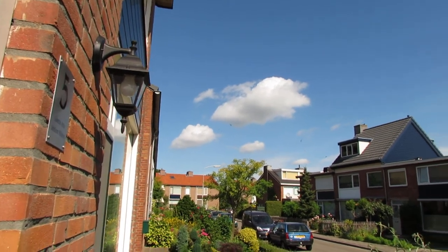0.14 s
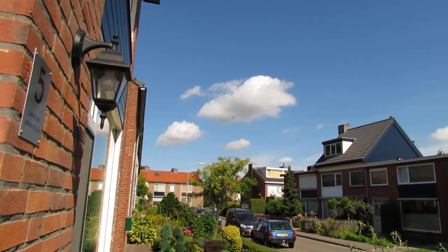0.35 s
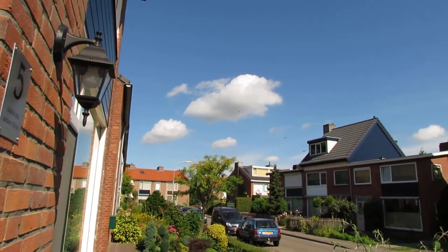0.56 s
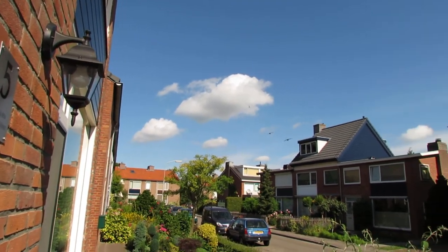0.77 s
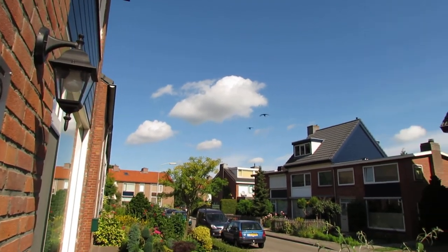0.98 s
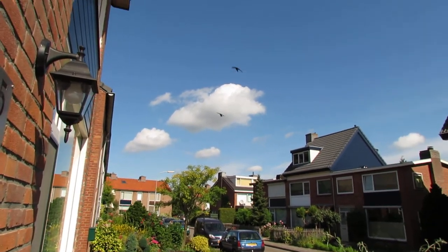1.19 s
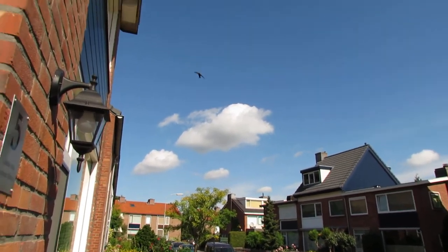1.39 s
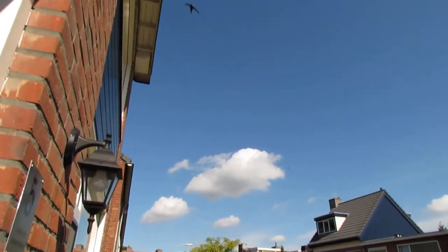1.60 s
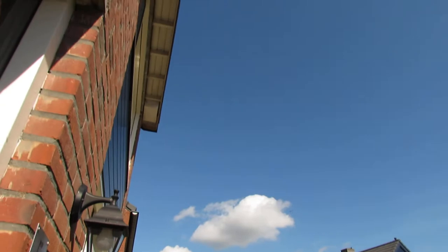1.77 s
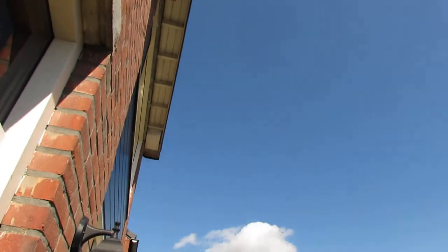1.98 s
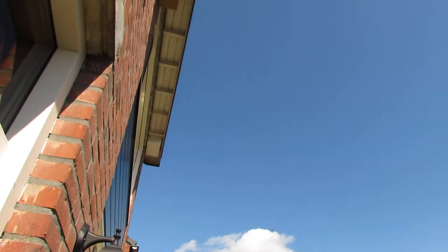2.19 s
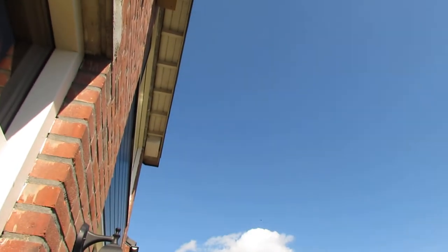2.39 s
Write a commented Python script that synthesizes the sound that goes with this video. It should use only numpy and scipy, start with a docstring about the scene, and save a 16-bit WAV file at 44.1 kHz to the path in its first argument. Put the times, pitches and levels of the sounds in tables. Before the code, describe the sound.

Swifts scream in a residential street over soft low traffic rumble and a faint engine hum. Thin, buzzing whistles around 6 kHz rise from 0.2 s, with stuttering short notes at 0.65-0.95 s. The loudest, closest screams come at 1.05-1.45 s, overlapping a rapid trill until 1.56 s. Echoes fade off the houses; small knocks follow at 1.8 s, ticks and a faint distant crow-like yelp near 2.1 s.

```python
"""Over rumbling traffic and an engine hum, swifts scream as they race along a brick street and over the eaves.
Each scream is a rising whistle near 6 kHz, shaken about 260 times a second; trills of short notes break in.
A crow-like bird yelps far off, a falling stack of harmonics, early on and once more near the end.
House fronts throw the calls back as echoes and a noise tail; gain control ducks under the loudest screams.
After the last trill come small knocks and ticks, each a dying ring."""
import sys
import numpy as np
from scipy import signal
from scipy.io import wavfile
from scipy.ndimage import uniform_filter1d, minimum_filter1d

SR = 44100
rng = np.random.default_rng(int(sys.argv[2]) if len(sys.argv) > 2 else 0)


def decibels_to_gain(level_db):
    """Convert a level in decibels to a linear amplitude gain (20 dB per decade)."""
    exponent = np.asarray(level_db, float) / 20
    return 10 ** exponent


def generate_wav(sig):
    """Save sig (samples, or channels by samples) to the path in sys.argv[1] as 16-bit PCM at SR."""
    pcm = np.round(np.clip(np.atleast_2d(sig).T, -1, 1) * 32767).astype(np.int16)
    wavfile.write(sys.argv[1], SR, pcm)


N = 108045

# Balance of the swift's voice: relative level in dB of the partials at 0.5, 1, 1.5, 2 and 2.5 x pitch
PARTIAL_DB = [-11, 1, 1.5, -11, -5.5]
# Half the left-minus-right difference for each ear
SIDES = np.array([[.5], [-.5]])


def curve(rows):
    """Columns of a table at every sample, and a gate that is open while the table lasts."""
    edge_s = .003
    s, *cols = np.transpose(rows)
    t = np.arange(N) / SR
    gate = np.clip(np.minimum(t - s[0] + edge_s, s[-1] + edge_s - t) / edge_s, 0, 1)
    return [np.interp(t, s, c) for c in cols] + [gate]


def unit(x):
    """Scale to rms 1."""
    return x / np.sqrt(np.mean(x ** 2) + 1e-20)


def drift(rate_hz):
    """Random wander of rms 1: noise through a two-pole lowpass."""
    r = np.exp(-2 * np.pi * rate_hz / SR)
    noise = rng.standard_normal(N + SR)
    settled = signal.lfilter([1], [1, -2 * r, r * r], noise)[SR:]
    return unit(settled)


def turns(hz):
    """Running phase in rad."""
    return 2 * np.pi * np.cumsum(hz) / SR


def butter(x, order, hz, kind="low"):
    """Butterworth filter."""
    return signal.sosfilt(signal.butter(order, hz, kind, fs=SR, output="sos"), x)


def traffic():
    """Traffic rumble: half-octave bands of stereo noise, each flickering a little."""
    # Spectrum. Each row: frequency in Hz, relative band level in dB.
    spectrum = [(13, -42), (22, -4.5), (109, -2.5), (469, -14), (710, -16), (1200, -17.5), (2670, -25.5),
                (3230, -30.5), (5170, -27.5), (5930, -34), (16000, -44)]
    # Stereo width. Each row: frequency in Hz, left-right likeness (1 = same in both ears).
    likeness = [(30, 0.071), (70, 1), (140, 0), (300, 0)]
    level_db, flicker_db, low_cut_hz = -44.5, 1.8, 36

    def read(points, hz):
        point_hz, value = np.transpose(points)
        return np.interp(np.log(hz), np.log(point_hz), value)

    out, edges = 0, 20 * 2 ** np.arange(0, 10.1, .5)
    # neighbouring bands take different noise
    white = rng.standard_normal((2, 2, N))
    for k, (low, high) in enumerate(zip(edges, edges[1:])):
        mid, side = butter(white[k % 2], 2, [low, high], "band")
        hz = np.sqrt(low * high)
        alike = np.clip(read(likeness, hz), -1, 1)
        band = np.sqrt(1 + alike) * mid + np.sqrt(1 - alike) * side * [[1], [-1]]
        out = out + decibels_to_gain(read(spectrum, hz) + flicker_db * drift(10)) * band
    return decibels_to_gain(level_db) * unit(butter(out, 2, low_cut_hz, "high"))


def tone(rows, waver_hz, lead_rad):
    """A sine wavering in pitch and level, the left ear's phase ahead by lead_rad."""
    hz, db, gate = curve(rows)
    level = decibels_to_gain(db + 2.0 * drift(2.9))
    phase = turns(hz + waver_hz * drift(5.4)) + [[lead_rad], [0]]
    return np.sqrt(2) * gate * level * np.sin(phase)


def engine_hum():
    """One low wavering sine for the engine, fading as it draws away."""
    # Path of the hum. Each row: time in seconds, pitch in Hz, level in dB.
    hum = [(0, 60.4, -41.5), (.3, 63.1, -57.5), (.56, 62.44, -38.5), (.9, 63.55, -49), (1.3, 63.8, -41.5),
           (1.5, 61.22, -55), (2.45, 57.6, -71)]
    return tone(hum, 1.1, 0.516)


def faint_whine():
    """A faint wavering sine that fades early."""
    # Path of the whine. Each row: time in seconds, pitch in Hz, level in dB.
    whine = [(0, 1350, -54.5), (.12, 1367, -58), (.17, 1325, -70)]
    return tone(whine, 56, 0)


def knocks():
    """Small knocks and ticks, each one dying ring."""
    # The rings. Each row: start in seconds, peak in dB, pitch in Hz, time to fall 60 dB in seconds.
    rings = [(1.796, -42.5, 1950, 0.016), (1.797, -38.5, 560, 0.068), (1.806, -38.5, 690, 0.029),
             (1.82, -40, 623, 0.0427), (1.885, -45.5, 943, 0.053), (2.09, -49.5, 9200, 0.0084),
             (2.115, -57.5, 7200, 0.0159)]
    t = np.arange(N) / SR
    out = 0
    for start, db, hz, t60 in rings:
        fade = decibels_to_gain(db - 60 * np.maximum(t - start, 0) / t60)
        out = out + fade * (t > start) * np.sin(2 * np.pi * hz * (t - start))
    return out


def street(x):
    """House fronts: a few hard echoes and a scattered noise tail, partly different in each ear."""
    # Single echoes. Each row: delay left and delay right in seconds, level in dB.
    echoes = [(.0021, .0034, -10), (0.008, 0.019, -5), (0.079, .077, -27.5), (0.08, 0.09, -12.5)]
    wet_db, alike, split_hz, onset_s = -7, 0.93, 8940, 0.0088
    near_t60_s, treble_t60_s, treble_db = 0.42, 0.34, -5.5
    far_t60_s, far_db = 0.91, -23  # late tail from distant houses
    t = np.arange(SR) / SR
    both, own = rng.standard_normal(SR), rng.standard_normal((2, SR))
    tail = (np.sqrt(alike) * both + np.sqrt(1 - alike) * own) * np.minimum(1, t / onset_s)
    dull = butter(tail, 2, split_hz)
    bright = butter(tail, 2, split_hz, "high")
    dull_fade = decibels_to_gain(-60 * t / near_t60_s) + decibels_to_gain(far_db - 60 * t / far_t60_s)
    tail = dull * dull_fade + bright * decibels_to_gain(treble_db - 60 * t / treble_t60_s)
    # the tail's energy sets its level
    tail *= decibels_to_gain(wet_db) / np.sqrt(np.sum(tail ** 2, axis=1, keepdims=True))
    for left_s, right_s, db in echoes:
        tail[0, int(left_s * SR)] += decibels_to_gain(db)
        tail[1, int(right_s * SR)] += decibels_to_gain(db)
    return signal.fftconvolve(x * np.ones((2, 1)), tail, axes=1)[:, :N]


def caw():
    """Falling harmonic yelps coloured by a throat resonance, each with its echo."""
    # The calls. Each row: start in seconds, level in dB added to the shape, share of the shape's pitch.
    calls = [(.423, -13, .8), (2.146, 0, 1.0)]
    # Their common shape. Each row: seconds after the start, pitch in Hz and level in dB before the call's own.
    shape = [(.003, 1390, -48), (.014, 1282, -43), (.024, 1068, -46), (.033, 1000, -48), (.044, 870, -53),
             (.058, 740, -54), (.09, 620, -54.5)]
    # Relative level in dB of each harmonic, from the first up
    harmonic_db = [3, 5.5, -1, 5, 2]
    throat_hz, octave_off_db, deepest_db = 2110, -16.5, -10
    dulls_db = 11  # loss per harmonic above the second and per octave of fall
    echo_s, echo_db = .038, -8

    def colour(k, hz):
        throat = np.maximum(octave_off_db * np.log2(k * hz / throat_hz) ** 2, deepest_db)
        return throat + dulls_db * max(k - 2, 0) * np.log2(hz / hz[0])

    voice = 0
    for start, call_db, share in calls:
        hz, db, gate = curve(np.array(shape) + [start, 0, call_db])
        hz = share * hz
        stack = 0
        for k, partial_db in enumerate(harmonic_db, 1):
            # every harmonic has its own pitch jitter
            jitter = share * 5.9 * drift(160)
            stack = stack + decibels_to_gain(partial_db + colour(k, hz)) * np.sin(k * turns(hz + jitter))
        voice = voice + gate * decibels_to_gain(db) * stack
    return voice + decibels_to_gain(echo_db) * np.roll(voice, int(echo_s * SR))


def syrinx(hz, depth, half_db, octave_db, buzz, lead, unsteady, rasp_db, rough):
    """A whistle shaken in phase and level at the buzz rate, with rasp and unsteady odd half-pitch partials."""
    swing_rad, swell, buzz_lead_rad = 0.96, 0.88, .3  # the small lead favours the upper side lines
    half_swell, octave_swell = .6, 0.18
    octave_swing_rad, octave_side_db, octave_rasp_db = .6, -1, 10
    flip_from, flip_over = .24, .1  # buzz depth where flipping sets in, and span to full
    wobble, rasp = unsteady
    phase = turns(hz) + swing_rad * depth * np.sin(buzz)
    shake = depth * np.cos(buzz + buzz_lead_rad)
    # a deep buzz flips the sign of the odd partials on each beat
    flip = np.clip((depth - flip_from) / flip_over, 0, 1)
    beat = 1 - flip + flip * np.sqrt(2) * np.cos(buzz / 2)
    odd = beat * decibels_to_gain(half_db) * (1 - rough + rough * wobble) * (1 + half_swell * shake)
    whistle = 1 + swell * shake + decibels_to_gain(rasp_db) * rasp
    octave = 1 + octave_swell * shake + decibels_to_gain(rasp_db + octave_rasp_db) * rasp
    octave = decibels_to_gain(octave_db) * octave * decibels_to_gain(octave_side_db * SIDES)
    # the two upper partials swing further and lead in one ear
    upper_phase = lead * SIDES + octave_swing_rad * depth * np.sin(buzz)
    voice = 0
    for k, (db, gain) in enumerate(zip(PARTIAL_DB, [odd, whistle, odd, octave, odd]), 1):
        voice = voice + decibels_to_gain(db) * gain * np.sin(k / 2 * phase + upper_phase * (k > 3))
    return np.sqrt(2) * voice


def breath_noise():
    """Slow wobble for the half-pitch partials and faster noise for the rasp."""
    return np.array([drift(398), drift(2200)])


def note(start, db, hz, length, octave_db, sag, unsteady):
    """A short syrinx note: it starts with a click, glides by its sag and ends round."""
    # Breath of a note: rasp round the whistle in dB, unsteady share of the half-pitch partials
    rasp_db, rough = (-30, .25)
    depth, half_db, buzz_rate = 0.23, -20, 260
    click_db, click_s = -27.5, 0.00053
    u = np.arange(int(length * SR)) / (length * SR)
    shape = np.minimum(1, 7 * u) * np.cos(np.pi / 2 * u) ** 0.41
    buzz = turns(buzz_rate + 0 * u) + rng.uniform(0, 2 * np.pi)
    i = int(start * SR)
    end = i + len(u)
    glide = hz * (1 + sag * (.5 - u))
    whistle = syrinx(glide, depth, half_db, octave_db, buzz, 0, unsteady[:, i:end], rasp_db, rough) / np.sqrt(2)
    click = decibels_to_gain(click_db) * np.diff(unsteady[1, i:end + 1]) * np.exp(-u * length / click_s) * 2.7
    out = np.zeros((2, N))
    out[:, i:end] = decibels_to_gain(db) * (shape * whistle + click)
    return out


def trills():
    """Runs of short notes from the syrinx, leaning left, with low notes between and around them."""
    # Trill notes. Each row: start in seconds, level in dB, pitch in Hz, length in seconds,
    # relative level of the octave partial in dB.
    notes = [(0.647, -19, 5856, 0.012, -4), (0.665, -22, 5830, 0.0058, 7), (0.679, -20.5, 5745, 0.011, 0.5),
             (0.7, -21, 5730, 0.004, -5), (0.714, -17, 5690, 0.01, -4), (0.738, -16.5, 5610, 0.0059, -4.5),
             (0.749, -14.5, 5330, 0.0053, -6), (0.761, -24.5, 4920, 0.0087, -5.5),
             (0.778, -34.5, 4360, 0.0068, -10), (0.82, -12, 5884, 0.0041, -2),
             (0.846, -20.5, 6080, 0.0161, 2.5), (0.8811, -18.5, 5736, 0.0085, -6),
             (0.914, -21, 5340, 0.0033, -3), (.93, -26.5, 5950, .01, -23.5), (1.339, -8.5, 5710, 0.006, 5),
             (1.3481, -10, 5634, 0.013, -1), (1.3631, -1, 5697, 0.0076, -3.5),
             (1.377, -7.5, 5675, 0.0084, -2), (1.389, -4, 5787, 0.0098, -1.5), (1.406, -11, 5675, 0.01, 0),
             (1.419, -9, 5680, 0.012, -1), (1.4368, -6.5, 5470, 0.0042, -3),
             (1.4496, -13, 5310, 0.007, 0.5), (1.465, -12, 5075, 0.0053, 0.5), (1.479, -20, 4799, 0.011, 1),
             (1.496, -26, 4300, 0.0088, 6.5), (1.447, -19, 5920, 0.0056, 12.5),
             (1.478, -17, 5970, 0.011, 11), (1.51, -10, 5680, 0.0089, -1),
             (1.5445, -9.5, 5277, 0.005, -4.5), (1.56, -16, 5600, .0025, 0)]
    # Low notes between and around them; the last row is the echo of the one before. Each row: start in seconds,
    # level in dB, pitch in Hz, octave partial over that level in dB, share of pitch lost.
    low_notes = [(.286, -36, 4340, -20, 0.28), (.834, -55.5, 3930, 18.5, .02),
                 (.859, -49.5, 4037, 15.5, -0.062), (.894, -56, 3680, 18.5, 0.12),
                 (1.461, -47, 3760, 24, 0.014), (1.492, -43, 3870, 19, 0.083),
                 (1.522, -51.5, 3593, 19.5, -0.088), (1.595, -37, 3900, 0.5, 0.276),
                 (1.68, -48, 3908, -11.5, .2)]
    sag, low_note_s, side_db = 0.041, 0.013, 3
    unsteady = breath_noise()
    trill = sum(note(*row, sag, unsteady) for row in notes)
    for start, db, hz, octave_db, low_sag in low_notes:
        # the voice's own octave balance is taken out
        trill += note(start, db, hz, low_note_s, octave_db - PARTIAL_DB[3], low_sag, unsteady)
    return trill * decibels_to_gain(side_db * SIDES)


def screams():
    """Long buzzing whistles, all leaning slightly left; returns the direct sound and its street send."""
    # One table per scream. Each row: time in seconds, pitch in Hz, level in dB, buzz depth 0-1,
    # relative level of the half-pitch partials in dB.
    paths = [
        [(0.0, 4920, -44.5, .3, -18), (.05, 5246, -47.5, .3, -13), (.1, 5457, -47, .4, -25.5),
         (.15, 5484, -53.5, 0.66, -21), (.175, 5440, -61, 0.8, -26)],
        [(.17, 4806, -48, 0.22, -31.5), (.177, 5200, -33, 0.4, -23), (.19, 5570, -28.5, .2, -34),
         (.212, 6110, -26, 0.03, -38.5), (.23, 6224, -25.5, 0.2, -18), (.262, 5770, -30, 0, -45),
         (.308, 5490, -29.5, 0.9, -43.5), (.345, 5744, -30.5, .5, -37.5), (.375, 6058, -28, 0.8, -42),
         (.418, 6173, -26, .7, -35), (.476, 6112, -31, 1, -30), (.55, 6007, -37, 0.96, -16.5),
         (.6, 5880, -36.5, .9, -20.5)],
        [(.592, 4400, -41.5, 0, -16.5), (.602, 5000, -36.5, 0.04, -10.5), (.617, 5450, -27.5, 0.3, -22),
         (.624, 5594, -19.5, 0.6, -23.5), (.631, 5700, -33.5, 0.04, -22.5), (.642, 5793, -26.5, 0, -45),
         (.664, 5920, -28, 0.56, -16.5), (.708, 5943, -25.5, 0.4, -47), (.78, 5859, -28, 0.82, -19),
         (.818, 5992, -23.5, 0.2, -38.5)],
        [(1.028, 4460, -41.5, .1, -5), (1.039, 5060, -31, 0.06, -2.5), (1.047, 5036, -29.5, .1, -34.5),
         (1.056, 5206, -22, 0, -22), (1.08, 5724, -19.5, .2, -12.5), (1.116, 6096, -15, 0.5, -11.5),
         (1.162, 6206, -17, 0.8, -13.5), (1.175, 6254, -18.5, 0.44, -34), (1.2, 6165, -16.5, 0.74, -50.5),
         (1.23, 6114, -15.5, 0.8, -27.5), (1.262, 6110, -15, 0.96, -20), (1.29, 6054, -21, .7, -40),
         (1.322, 5765, -17.5, .7, -32), (1.435, 5766, -20.5, .75, -34)],
        [(1.235, 4293, -31, 0.4, -16), (1.247, 5100, -26.5, 0.12, -13.5), (1.265, 5420, -17.5, 0.26, -12.5),
         (1.3, 5700, -16.5, 0.28, -22.5), (1.335, 5702, -21, 0.8, -8.5)],
    ]
    # One row per scream: buzzes per second, level left minus right in dB, relative octave level in dB,
    # octave lead of left over right in rad, street send in dB.
    birds = [(259.5, 0.5, -4, 0.3, 12.5), (266.6, 0.7, -2, -1.5, 2.5), (287, 0.5, -3, 1.2, 4.5),
             (260, 2, 0.5, 0.82, -1.5), (256, 1, -2.5, 0.5, -2.5)]
    # One row per scream: rasp round the whistle in dB, unsteady share of the half-pitch partials,
    # pitch jitter in Hz.
    breath = [(-25, .8, 20), (-22, .8, 26), (-32, .6, 10), (-36, .12, 13), (-28, .5, 30)]
    buzz_drift, flutter_db = 0.014, 0.84
    direct, send = 0, 0
    for rows, bird, (rasp_db, rough, jitter_hz) in zip(paths, birds, breath):
        rate, side_db, octave_db, lead, send_db = bird
        hz, db, depth, half_db, gate = curve(rows)
        hz = uniform_filter1d(hz, size=441) + jitter_hz * drift(152)
        buzz = turns(rate * (1 + buzz_drift * drift(18)))
        level = gate * decibels_to_gain(db + flutter_db * drift(40) + side_db * SIDES)
        depth = np.clip(depth, 0, 1)
        voice = level * syrinx(hz, depth, half_db, octave_db, buzz, lead, breath_noise(), rasp_db, rough)
        direct = direct + voice
        send = send + decibels_to_gain(send_db) * voice
    return direct, send


def swifts():
    """Screams and trills through one beak lowpass; returns the direct sound and the street send."""
    beak_cut_hz, trill_send_db = 12840, -4.5
    direct, send = screams()
    trill = trills()
    return butter([direct + trill, send + decibels_to_gain(trill_send_db) * trill], 3, beak_cut_hz)


def scene():
    """Birds and knocks in the street, over the traffic."""
    background = traffic() + engine_hum() + faint_whine() + knocks()
    far = caw()
    far_wet = street(decibels_to_gain(-6) * far)
    direct, send = swifts()
    return background + far + far_wet + direct + street(send)


def gain_control(x):
    """Peaks over the knee pull the gain down; it holds, then creeps back."""
    knee_db, ratio, hold_s, back_db_per_s, attack_s = -5, 0.85, 0.2, 19, 0.019
    peak_db = 20 * np.log10(np.abs(x).max(axis=0) + 1e-9)
    over = np.maximum(peak_db - knee_db, 0) * ratio
    hold = int(hold_s * SR)
    # running maximum of the latest samples
    held = -minimum_filter1d(-over, size=hold, origin=(hold - 1) // 2)
    ramp = back_db_per_s * np.arange(N) / SR
    cut_db = np.maximum.accumulate(held + ramp) - ramp
    r = np.exp(-1 / (attack_s * SR))
    return x * decibels_to_gain(-signal.lfilter([1 - r], [1, -r], cut_db))


def overload(x):
    """Soft tanh saturation that rounds the peaks."""
    ceiling = .85
    return ceiling * np.tanh(x / ceiling)


def roll_off(x):
    """The treble ends steeply here."""
    return signal.sosfilt(signal.butter(12, 16270, fs=SR, output="sos"), x)


def record(dry):
    """Gain control, then soft overload, give the finished mix."""
    mix = overload(gain_control(dry))
    return roll_off(mix)


dry = scene()
out = record(dry)
generate_wav(out)
```